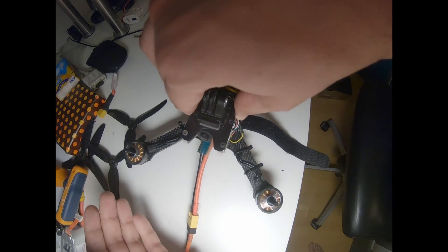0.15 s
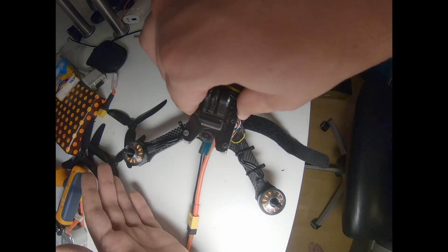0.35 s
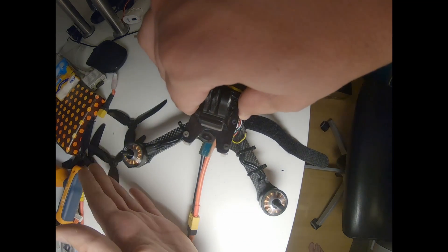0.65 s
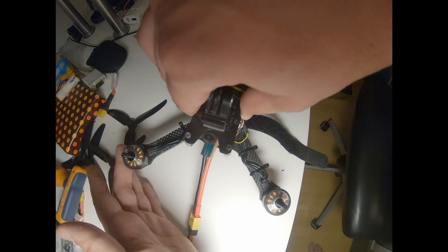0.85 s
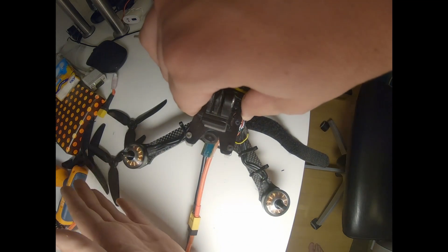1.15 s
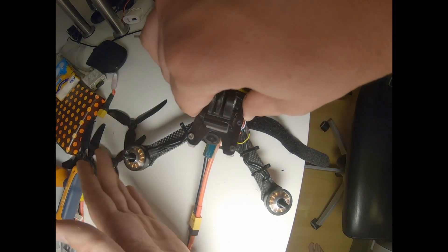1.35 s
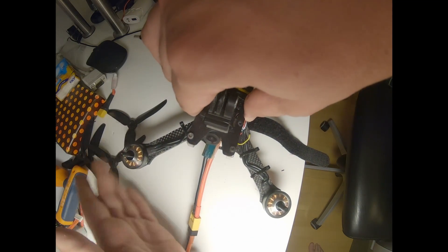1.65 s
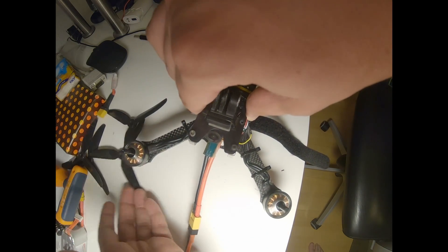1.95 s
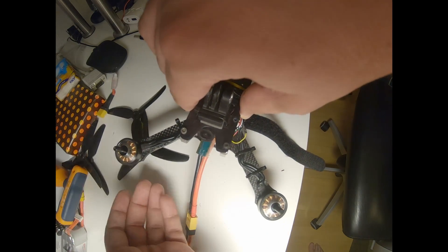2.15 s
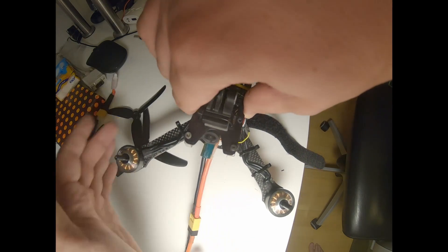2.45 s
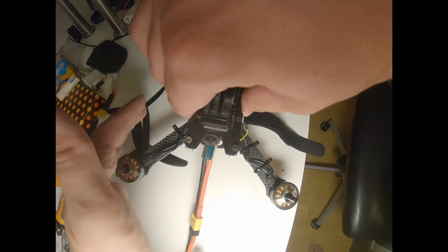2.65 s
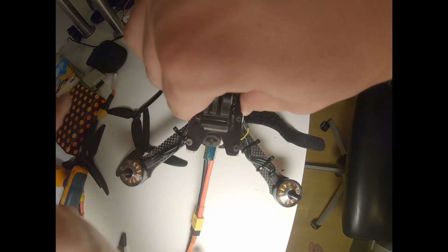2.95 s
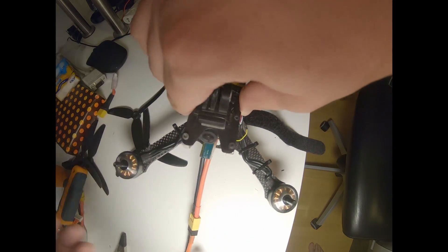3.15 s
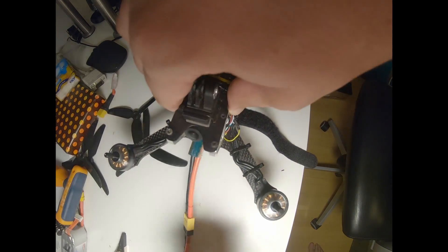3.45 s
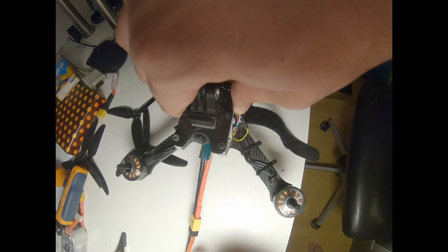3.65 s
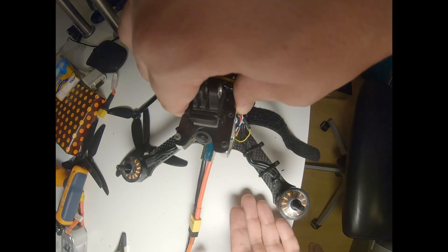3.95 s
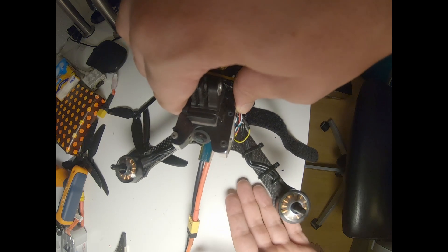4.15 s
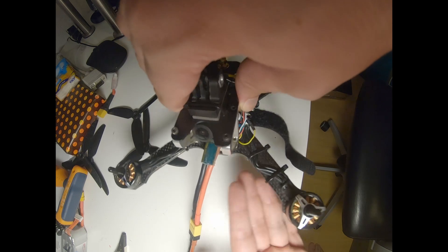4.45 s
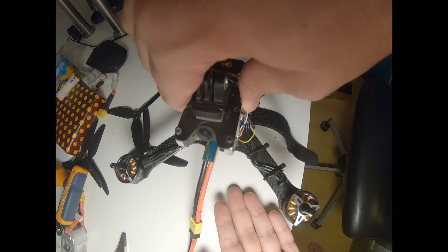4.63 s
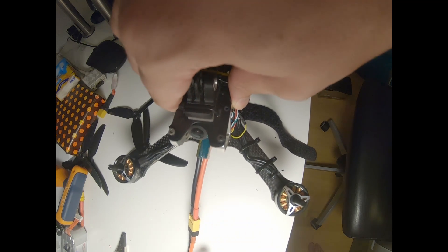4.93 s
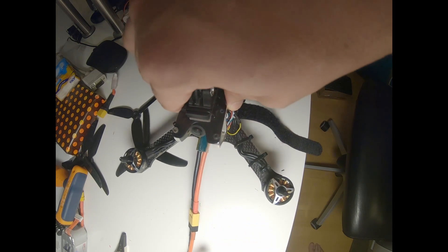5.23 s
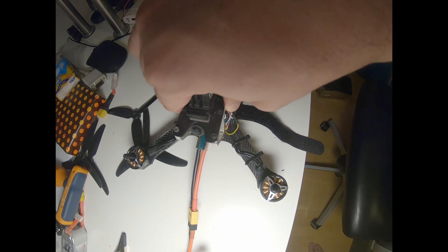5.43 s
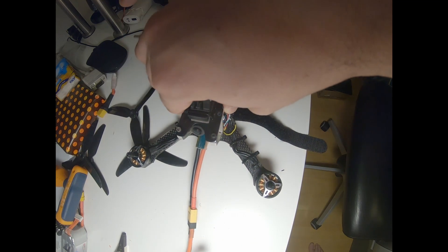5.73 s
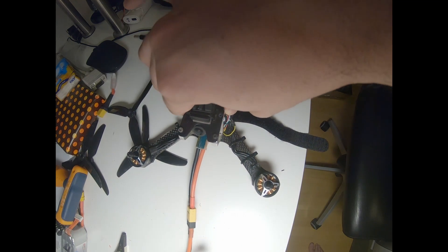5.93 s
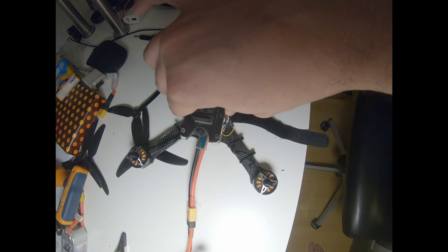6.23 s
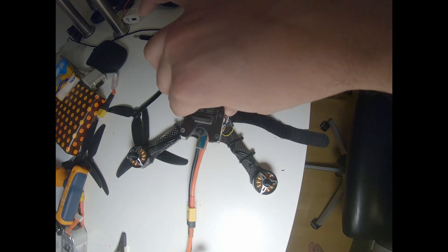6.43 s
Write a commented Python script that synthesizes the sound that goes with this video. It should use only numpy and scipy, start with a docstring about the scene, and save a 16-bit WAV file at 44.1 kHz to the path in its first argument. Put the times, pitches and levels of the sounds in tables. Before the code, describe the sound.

Small drone motors run without propellers, making a rough, high buzzing hiss with faint wavering whines. The hiss surges several times as the hand-held frame is bumped, while a loose propeller scrapes and something knocks on the desk. The motors stop with a jolt. After faint finger rubs and ticks, the frame settles with a short, louder clatter. The microphone is close, in a quiet room.

```python
"""A desk in a quiet room, close to a two-port microphone. Small brushless motors jitter without
propellers on a hand-held drone frame: torque ripple makes a rough hiss that rings in the carbon
arms and metal bells, surges when the frame is bumped, and stops with a jolt. Knocks ring the desk,
a loose propeller scrapes, small ticks sound, a finger slides on the frame and the frame settles."""
import sys
import numpy as np
from scipy import signal
from scipy.fft import rfft, irfft, next_fast_len
from scipy.io import wavfile
from scipy.ndimage import uniform_filter1d

SR = 44100
rng = np.random.default_rng(int(sys.argv[2]) if len(sys.argv) > 2 else 0)


def inscribe(sig):
    """Save sig as 16-bit PCM at rate SR to the path in sys.argv[1].

    A 1-D sig is mono; a 2-D sig holds one channel per row.
    Samples are clipped to [-1, 1] before scaling.
    """
    pcm = np.round(np.clip(np.atleast_2d(sig).T, -1, 1) * 32767)
    wavfile.write(sys.argv[1], SR, pcm.astype(np.int16))


N = 290619
SIZE = next_fast_len(N + SR)
HZ, T = np.fft.rfftfreq(SIZE, 1 / SR), np.arange(N) / SR


def amp(db):
    """dB to gain."""
    return 10 ** (np.asarray(db) / 20)


def unit_rms(x):
    """Scale to rms 1."""
    return x / np.sqrt(np.mean(abs(x) ** 2) + 1e-20)


def curve(points, hz):
    """Interpolate (f/Hz, value) rows over log frequency."""
    f, value = np.transpose(points)
    return np.interp(np.log(hz + 1), np.log(f + 1), value)


def add(mix, at_s, sound):
    """Mix a sound in at at_s."""
    part = mix[..., round(at_s * SR):][..., :sound.shape[-1]]
    part += sound[..., :part.shape[-1]]


def filtered(x, response):
    """Apply a frequency response."""
    return irfft(rfft(x, SIZE) * response, SIZE)[..., :N]


def min_phase(gain):
    """Minimum-phase response for a magnitude; unit power gain on white noise."""
    log_gain = np.log(unit_rms(gain) + 1e-5)
    mirrored = np.concatenate([log_gain, log_gain[1:SIZE - len(HZ) + 1][::-1]])
    return np.conj(np.exp(signal.hilbert(mirrored)))[:len(HZ)]


def body(modes):
    """Steep resonances whose powers add; rows: f/Hz, width/Hz, level/dB."""
    power = sum(amp(2 * db) / (1 + (1.3 * (HZ - f) / width) ** 2) ** 2 for f, width, db in modes)
    return min_phase(np.sqrt(power))


def port_noise(coherence):
    """White noise at both ports; rows: f/Hz, correlation."""
    first, other = rng.standard_normal((2, N))
    alike = np.clip(curve(coherence, HZ), -1, 1)
    return np.array([first, filtered(first, alike) + filtered(other, np.sqrt(1 - alike ** 2))])


def wobble(span_s):
    """Noise smoothed over span_s, rms 1."""
    span = int(span_s * SR)
    return unit_rms(uniform_filter1d(uniform_filter1d(rng.standard_normal(N), span), span))


def patchy(x, depth_db):
    """Narrow bands swell and fade independently."""
    bands = signal.stft(x, nperseg=256)[2]
    patches = uniform_filter1d(rng.standard_normal(bands.shape[:0:-1]), size=14, axis=0)
    patches = uniform_filter1d(patches, size=2, axis=1)
    gain = amp(depth_db * unit_rms(patches.T))
    return signal.istft(bands * unit_rms(gain), nperseg=256)[1][:, :N]


def strokes(rows):
    """Envelope: each stroke rises, holds and decays."""
    gain = np.zeros(N)
    for at_s, db, rise_s, hold_s, t60_s in rows:
        attack = np.clip((T - at_s) / rise_s, 0, 1) ** 2
        gain += attack * amp(db - 60 * np.maximum(T - at_s - rise_s - hold_s, 0) / t60_s)
    return gain


def room_tone():
    """Low background noise, drifting slightly in level."""
    # spectrum: f/Hz, relative level/dB
    spectrum = [(25, -22), (60, -26), (105, -41.5), (135, -17), (270, -9.5), (400, -24.5), (750, -18.5),
                (930, -20), (1050, -31.5), (1500, -30), (2600, -43.5), (5000, -48), (15500, -62.5)]
    # likeness at the ports: f/Hz, correlation
    coherence = [(60, 0.42), (130, 0.41), (290, 0.82), (640, 0.05), (1410, 0.091), (3100, -0.65),
                 (6820, 0.2), (15000, 0.19)]
    level_db = -60.5 + 1.1 * wobble(.06)
    return amp(level_db) * unit_rms(filtered(port_noise(coherence), amp(curve(spectrum, HZ))))


def reflections(x):
    """A noise tail per port, each band decaying at its own rate; bass alike at both."""
    # room decay: f/Hz, t60/s
    decay = [(100, 0.55), (1000, 0.28), (3600, 0.23), (6700, 0.27), (9000, 0.33), (13000, 0.19)]
    noise = port_noise([(100, 1.0), (600, .9), (1500, 1.0), (4000, 0.91), (8000, .1)])[:, :SR // 2]
    hz, t, bands = signal.stft(noise, SR, nperseg=256)
    tail = signal.istft(bands * amp(-60 * t / curve(decay, hz)[:, None]), SR, nperseg=256)[1]
    tail = np.pad(tail / np.linalg.norm(tail[0]), ((0, 0), (150, 0)))  # pre-delay
    return signal.fftconvolve(x, tail, axes=1)[:, :N]


def rustle():
    """Grainy friction: a finger slides on the frame, then the frame settles."""
    # finger strokes: t/s, level/dB, rise/s, hold/s, t60/s
    rubs = [(4.6, -78.5, .01, .05, .15), (4.775, -73.5, 0.02, 0.0056, 0.38),
            (4.885, -67, 0.016, 0.027, 0.47), (5.078, -76, 0.0075, 0.019, 0.36),
            (5.118, -73.5, .015, .015, 0.35), (5.29, -75, 0.026, 0.0096, .2),
            (5.652, -73.5, .008, .005, 0.24), (5.96, -82, .008, .005, 0.22),
            (6.025, -77, 0.011, 0.011, 0.52)]
    # frame movements: t/s, level/dB, rise/s, hold/s, t60/s
    settling = [(6.317, -37, .005, .003, 0.24), (6.384, -46, 0.003, .003, 0.25),
                (6.436, -57, 0.0031, 0.0081, 0.19), (6.5, -71, 0.027, .1, .5)]
    # finger spectrum: f/Hz, level/dB
    skin_tone = [(880, -46), (1500, -8), (2050, 5), (2130, -2.5), (7020, -7), (11600, -16), (15500, -36)]
    # frame spectrum: f/Hz, level/dB
    frame_tone = [(710, -42), (1200, -10), (1380, -7.5), (2260, -3.5), (3110, -11), (4340, -9.5),
                  (6110, -17.5), (10400, -23.5), (15500, -45)]
    grain = unit_rms(port_noise([(100, 1.0), (4000, 0.36), (8000, 0.11)]) * amp(1.2 * wobble(0.0033)))
    finger = filtered(grain * strokes(rubs), unit_rms(amp(curve(skin_tone, HZ))))
    frame = filtered(grain * strokes(settling), unit_rms(amp(curve(frame_tone, HZ))))
    return finger + frame


def ticks():
    """Short noise puffs, each narrowed around one pitch."""
    # small ticks: t/s, relative level/dB, f/Hz
    events = [(4.785, -67, 2730), (5.084, -58.5, 2420), (5.088, -61, 10000), (5.123, -58, 2200),
              (5.14, -57.5, 3400), (5.152, -63, 8500), (5.658, -63, 5480), (5.966, -71, 4250),
              (6.041, -63, 1650), (6.324, -29, 4400), (6.388, -39.5, 4000), (6.441, -43, 4100)]
    out, t = np.zeros(N), np.arange(2000) / SR
    for at_s, db, hz in events:
        puff = rng.standard_normal(len(t)) * amp(-60 * t / 0.014)
        ring = amp(-60 * t * hz / 14) * np.sin(2 * np.pi * hz * t)  # t60: 14 cycles
        add(out, at_s, amp(db - 8.0) * np.convolve(puff, ring)[:len(t)])
    return out


def propeller_scrapes():
    """Uneven slips excite a loose propeller dragged and rattled on the desk."""
    # drags: t/s, level/dB, rise/s, hold/s, t60/s
    drags = [(2.03, -40.5, 0.002, 0.1, .35), (2.19, -46.5, 0.0042, .025, .1),
             (2.298, -48, 0.0097, 0.037, .15), (5.69, -63, 0.0063, .015, 0.2),
             (5.785, -69, 0.0084, .005, .12), (6.17, -35, 0.0049, .003, 0.21),
             (6.226, -29, 0.0031, .003, .15)]
    # propeller resonances: f/Hz, width/Hz, level/dB
    modes = [(393, 254, -11.5), (677, 72, 1.5), (820, 110, -0.5), (1136, 220, -6.5), (1440, 210, -4.5),
             (1760, 400, -6), (2240, 250, -14.5), (2920, 1300, -19.5)]
    slips = unit_rms(port_noise([(500, 0.91), (1500, 0.37)]) * amp(5.0 * wobble(0.0012)))
    return filtered(slips * strokes(drags), body(modes))


def desk_knocks():
    """Each blow rings the desk modes near its favoured pitch, with a noisy crack on top."""
    # blows: t/s, level/dB, favoured f/Hz, spread/octaves, ring time factor
    blows = [(1.774, -37.5, 433, 0.98, 0.11), (2.102, -58, 131, 0.41, 1.4), (2.566, -50, 490, 1.6, 0.59),
             (2.579, -41, 400, 1.07, 0.99), (2.597, -23.5, 94.4, 0.33, 0.44),
             (2.608, -25, 1700, 0.86, 0.31), (2.613, -39.5, 247, 0.17, 3.1), (2.628, -34, 506, 0.67, 0.25),
             (4.135, -59, 157, 0.97, 0.47), (4.437, -47.5, 253, 1.3, 0.41), (4.458, -39.5, 181, 0.3, 0.56),
             (4.498, -42, 81.4, 0.52, 0.43), (4.9, -57.5, 131, 1, 1.1), (5.693, -53, 769, 0.21, 0.64),
             (6.17, -34.5, 694, 1.46, 1.17), (6.172, -29, 249, .25, 1.37), (6.228, -14.5, 965, 0.3, 0.34),
             (6.23, -23.5, 320, 0.45, 0.46), (6.243, -28.5, 99, 0.89, 0.76), (6.265, -25, 620, 0.83, 0.18),
             (6.281, -33.5, 149, 0.97, 0.9), (6.32, -27.5, 650, 0.33, 0.5), (6.388, -40.5, 680, .8, 0.41),
             (6.395, -37, 126, .41, 0.71)]
    # desk modes: f/Hz, level/dB, t60/s
    modes = [(67, 1, 0.34), (96, -5.5, 0.21), (132.8, 5, 0.49), (203.5, 0, 0.37), (244.3, 4.5, 0.17),
             (307, -3.5, 0.27), (394, -6.5, 0.41), (495, -4, 0.27), (590, 2.5, 0.098), (670, 5, 0.076),
             (787.6, 0, 0.21), (832, -10.5, 0.21), (908, 1, 0.17), (1060, -1, 0.11), (1260, -11, 0.052),
             (1350, 3, 0.042), (1710, 3, 0.086), (1648, -8, 0.022)]
    # crack spectrum: f/Hz, level/dB
    crack_tone = [(400, -20.5), (1000, -1), (1800, 7.5), (3000, -10.5), (5000, -15.5), (9000, -35),
                  (15000, -57.5)]
    hard_hz, settle_s, settle_t60_s = 930, 6.495, .09
    thud, crack, t = np.zeros((2, N)), np.zeros(N), np.arange(SR // 2) / SR
    hz, mode_db, t60_s = np.transpose(modes)[:, :, None]
    attack = 1 - np.exp(-t / 0.001)
    for at_s, db, favoured_hz, spread_oct, ring in blows:
        strength, detune, offset, side_shift = rng.standard_normal((4, len(modes), 1))
        reach_db = -6 * (np.log2(hz / favoured_hz) / spread_oct) ** 2
        envelope = amp(mode_db + reach_db + 1.2 * strength - 60 * t / (t60_s * ring)) * attack
        phase = 2 * np.pi * hz * (1 + 0.0054 * detune) * t + 1.2 * offset
        skew = 0.46 * hz / 1000 * side_shift  # higher modes differ more in phase between ports
        ports = np.array([(envelope * np.sin(phase + side * skew)).sum(0) for side in (1, -1)])
        add(thud, at_s, amp(db) * ports)
        crack_db = db - 4.5 + 11.5 * min(np.log2(favoured_hz / hard_hz), 0)  # dull blows crack less
        add(crack, at_s, amp(crack_db - 60 * t / (0.068 * ring)) * rng.standard_normal(len(t)) * attack)
    damping = amp(-60 * np.maximum(T - settle_s, 0) / settle_t60_s)  # a hand comes to rest and damps the desk
    return thud * damping + filtered(crack, min_phase(amp(curve(crack_tone, HZ))))


def motor_whines():
    """Speed changes: short, unsteady gliding tones, plus fainter ones at random."""
    # glides: start/s, end/s, start f/Hz, end f/Hz, level/dB
    glides = [(.035, .125, 6500, 4600, -56), (.475, .515, 5350, 4850, -55), (1.43, 1.475, 6000, 5500, -51),
              (2.4, 2.44, 5030, 5250, -55), (2.435, 2.485, 5200, 6300, -53),
              (2.655, 2.735, 8500, 7200, -56), (2.95, 3.0, 5600, 4500, -53), (3.22, 3.29, 5500, 5540, -50),
              (3.285, 3.34, 5620, 5720, -47), (3.235, 3.295, 1700, 1690, -47)]
    out, flutter, waver = np.zeros(N), amp(2.0 * wobble(.004)), 1 + .0015 * wobble(.006)
    faint = [(4.3 * when, 4.3 * when + .06, 4100 + 1900 * first, 4100 + 1900 * last, -64)
             for when, first, last in rng.random((24, 3))]
    for start_s, end_s, from_hz, to_hz, db in glides + faint:
        hz = np.linspace(from_hz, to_hz, round((end_s - start_s) * SR))
        hz *= waver[round(start_s * SR):][:len(hz)]
        tone = np.sin(2 * np.pi * np.cumsum(hz) / SR)
        add(out, start_s, amp(db) * signal.windows.tukey(len(hz), .5) * tone)
    return out * flutter


def motor_effort():
    """Drive of arms and bells: how hard the motors fight, plus torque surges."""
    # effort over idle: t/s, arm drive/dB, bell drive/dB
    effort = [(0, 5.5, 5), (.2, -1, 1.5), (.41, 0, 0.5), (.46, 2, 1.5), (.9, -2, -0.5), (1.2, 0, 1),
              (1.75, -0.5, 0), (2.0, 1, 3), (2.24, -3, 0), (2.45, 2, 3.5), (2.6, 9, 9.5), (2.7, 6, 6.5),
              (2.8, -1.5, 4.5), (3.03, -5.5, 0), (3.22, 6, 9.5), (3.33, 7, 12), (3.46, 1.5, 5.5),
              (3.58, 8.5, 12), (3.68, 8.5, 12.5), (3.75, 3.5, 5), (3.85, 4, 4.5), (3.88, -1, 2.5),
              (3.98, -1.5, 4), (4.1, -0.5, 3), (4.43, -2, 3.5)]
    # surges: t/s, rise/s, arm drive/dB, bell drive/dB, fade of the added dB to 0.1 %/s
    surges = [(0.924, .008, 6.5, 12, 0.63), (.95, .012, 5.5, 2, .3), (1.0, 0.01, 5, 4.5, 0.22),
              (1.37, 0.0045, 5.5, 11, 0.69), (1.389, 0.0078, 5, 8, 0.22), (1.78, 0.0038, 12.5, 22.5, 0.51),
              (2.035, .015, 4.5, 8.5, 0.46), (2.818, 0.025, 10.5, 11.5, 0.78),
              (4.439, 0.002, 5, 20.5, 0.13)]
    times_s, arm_points, bell_points = np.transpose(effort)
    arms_db, bells_db = np.interp(T, times_s, arm_points), np.interp(T, times_s, bell_points)
    for at_s, rise_s, arm_db, bell_db, fade_s in surges:
        surge = np.clip((T - at_s) / rise_s, 0, 1) * amp(-60 * abs(T - at_s) / fade_s)
        arms_db += arm_db * surge
        bells_db += bell_db * surge
    return arms_db, bells_db


def motors():
    """Random torque ripple shakes bells, bearings and arms; all follow the effort, then coast out."""
    # bell resonances: f/Hz, width/Hz, level/dB
    bells = [(6145, 230, -7.5), (6690, 330, 0), (7505, 400, -14), (8246, 425, -13), (9080, 440, -21.5),
             (9730, 400, -18), (10320, 590, -27), (11120, 930, -21.5), (13100, 1000, -29),
             (13540, 600, -48)]
    # bearing resonances: f/Hz, width/Hz, level/dB
    bearings = [(4840, 2300, -5.5), (5250, 360, -5.5), (5720, 280, -1.5)]
    # lower arm resonances: f/Hz, width/Hz, level on desk/dB, level lifted/dB
    low_arms = [(1470, 620, -17.5, -12), (1940, 1040, -9, -13.5), (2408, 400, -7.5, -0.5),
                (2674, 220, 0.5, -2), (2800, 340, 3.5, -6), (3185, 490, 4.5, -5.5)]
    # upper arm resonances: f/Hz, width/Hz, level on desk/dB, level lifted/dB
    high_arms = [(3590, 170, 0, 0), (3930, 300, -2.5, -6), (4200, 350, -6, -9)]
    # frame off the desk: t/s, share 0-1
    lifting = [(0, 0.42), (2.3, 0.64), (2.6, 0.96), (3.0, 0.9), (3.5, 0.78), (4.45, 0.93)]
    # likeness at the ports: f/Hz, correlation
    coherence = [(1200, 0.14), (2000, 0.81), (2800, 0.86), (3600, 0.92), (4300, 0.86), (5200, 0.26),
                 (6200, 0.4), (6900, 0.23), (8500, 0.13), (14000, 0.088)]
    # port balance: f/Hz, left minus right/dB
    balance = [(1200, -1), (2100, 2), (3400, 0.5), (5200, 0), (8300, -0.5), (9700, 0), (11300, -5),
               (13500, -3)]
    stop_s, arm_t60_s, bell_t60_s = 4.447, 0.062, 0.27
    arms_db, bells_db = motor_effort()
    ripple_db = 0.43 * wobble(0.001) + 0.69 * wobble(0.042)
    coast_s = np.maximum(T - stop_s, 0)
    lift = np.clip(np.interp(T, *np.transpose(lifting)), 0, 1)
    hiss = np.zeros((2, N))
    for modes, idle_db, slope in (bells, -51, 1.11), (bearings, -60, 1.33):
        level_db = idle_db + slope * bells_db + ripple_db - 60 * coast_s / bell_t60_s
        shake = port_noise(coherence) * amp(level_db + 1.6 * wobble(.04))
        hiss += filtered(shake, body(modes))
    for modes, idle_db, slope, lifted_db in (low_arms, -40.5, 0.77, 0.5), (high_arms, -44.5, 1.51, -0.5):
        level_db = idle_db + slope * arms_db + ripple_db - 60 * coast_s / arm_t60_s
        shake = port_noise(coherence) * amp(level_db + 1.2 * wobble(0.051))
        on_desk = body([(f, width, db) for f, width, db, _ in modes])
        lifted = body([(f, width, db) for f, width, _, db in modes]) * amp(lifted_db)
        hiss += filtered(shake * (1 - lift), on_desk) + filtered(shake * lift, lifted)
    radiation = HZ ** 2 / (HZ ** 2 + 900 ** 2)  # small parts radiate no bass
    port_gain = amp(np.outer([.5, -.5], curve(balance, HZ)))
    return filtered(patchy(hiss, depth_db=1.7) + motor_whines(), radiation * port_gain)


def scene():
    """Close sources, their reflections and the room tone."""
    drone = motors()
    desk = desk_knocks() + propeller_scrapes() + ticks()
    into_room = amp(-10.0) * drone + filtered(desk, amp(-4.0) * HZ / (HZ + 500))
    return drone + desk + rustle() + reflections(into_room) + room_tone()


def record(dry):
    """Microphone bass loss, a soft treble shoulder, then the recorder's band limit."""
    bass_hz, shoulder_hz, edge_hz = 35, 14600, 15760
    low_cut = (1j * HZ / (1j * HZ + bass_hz)) ** 2
    soft = filtered(dry, low_cut / np.sqrt(1 + (HZ / shoulder_hz) ** 30))
    band_limit = signal.firwin(511, edge_hz, window=("kaiser", 9), fs=SR)
    return signal.oaconvolve(soft, band_limit[None], "same")


dry = scene()
out = record(dry)
inscribe(out)
```